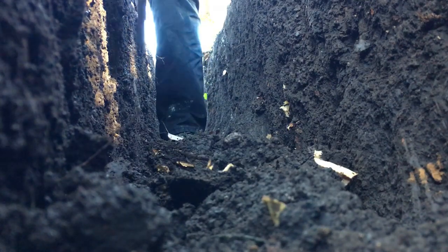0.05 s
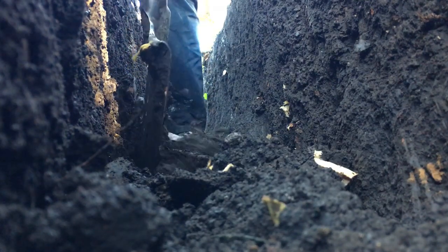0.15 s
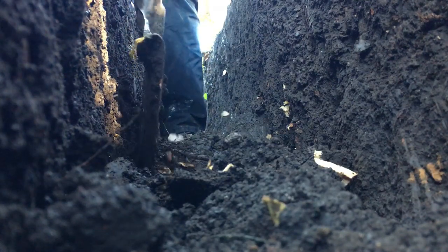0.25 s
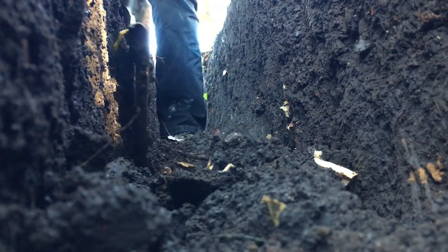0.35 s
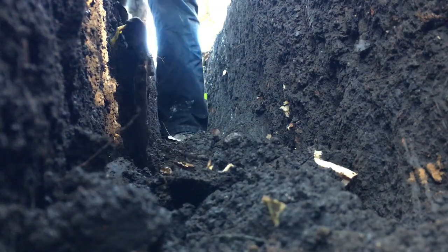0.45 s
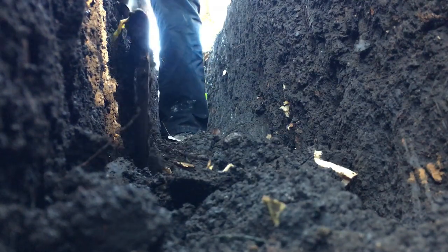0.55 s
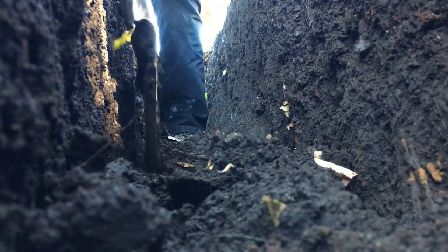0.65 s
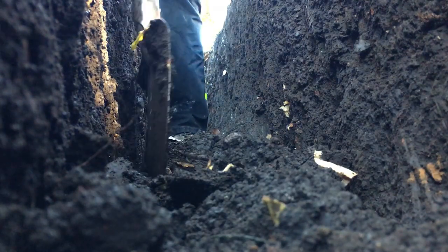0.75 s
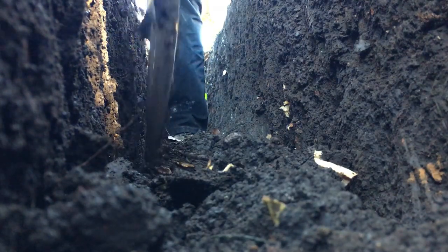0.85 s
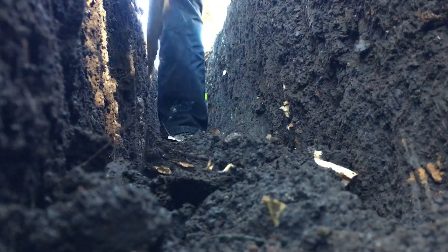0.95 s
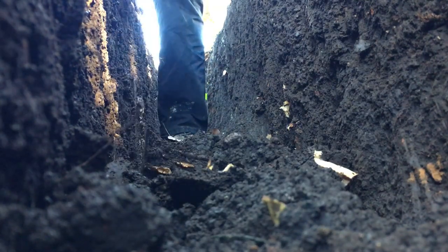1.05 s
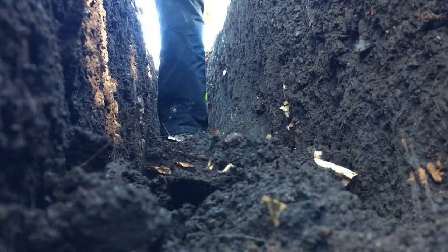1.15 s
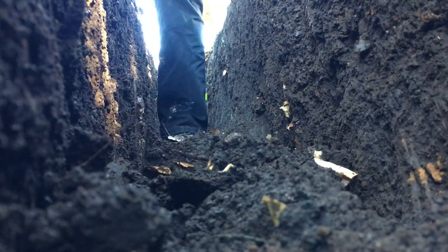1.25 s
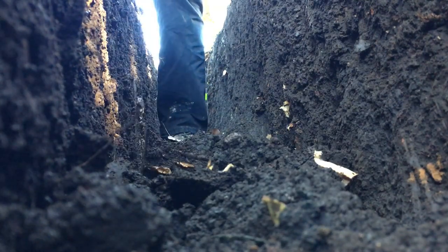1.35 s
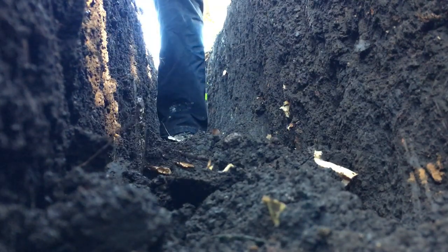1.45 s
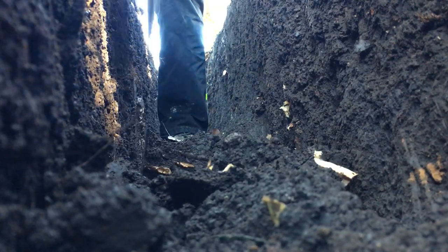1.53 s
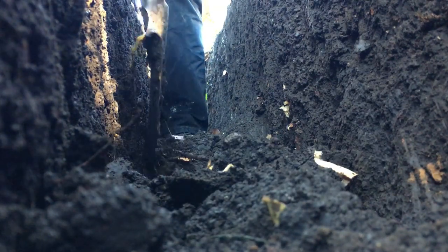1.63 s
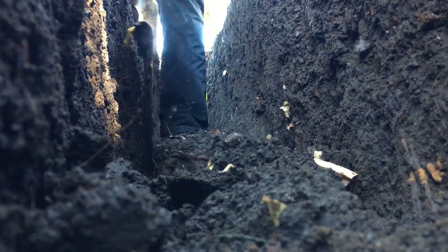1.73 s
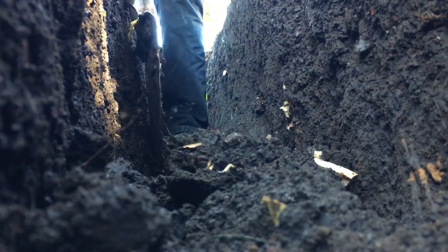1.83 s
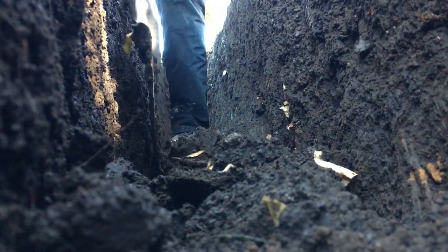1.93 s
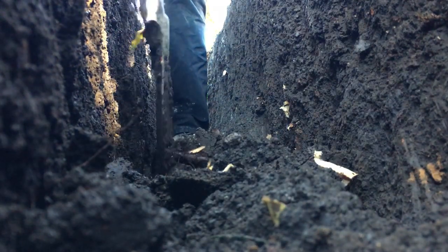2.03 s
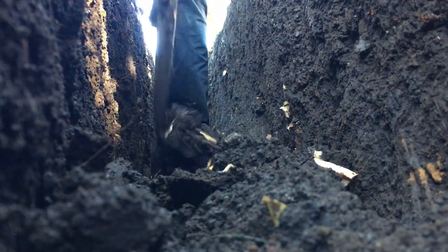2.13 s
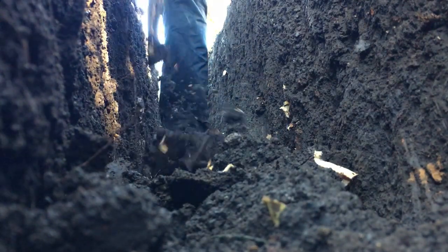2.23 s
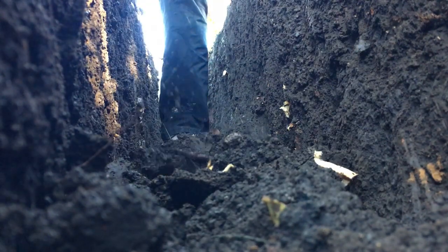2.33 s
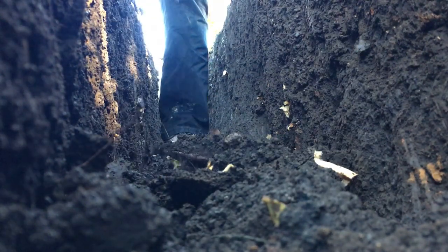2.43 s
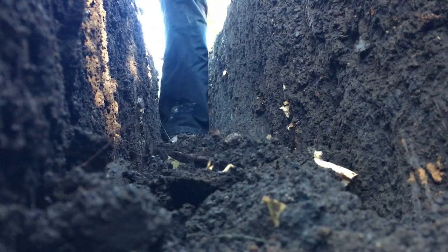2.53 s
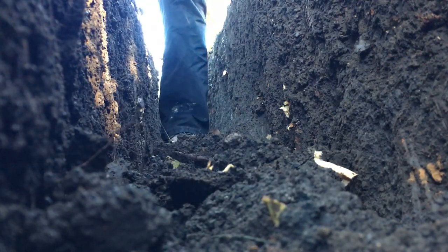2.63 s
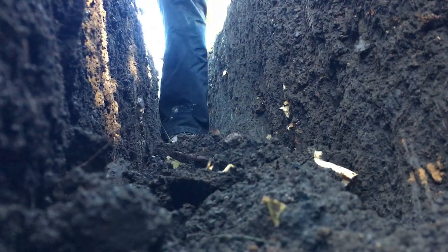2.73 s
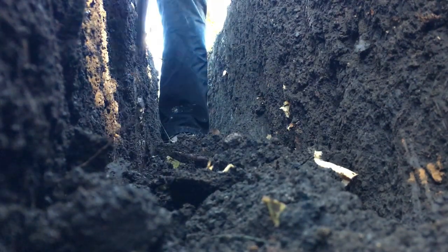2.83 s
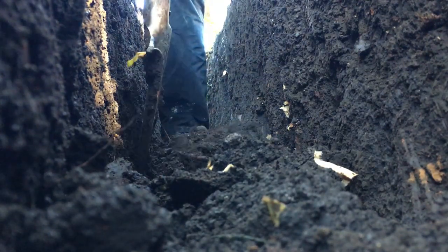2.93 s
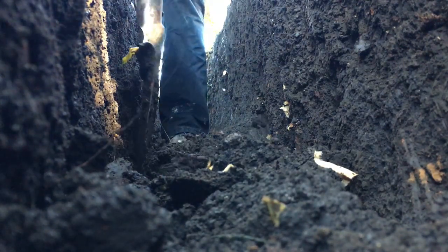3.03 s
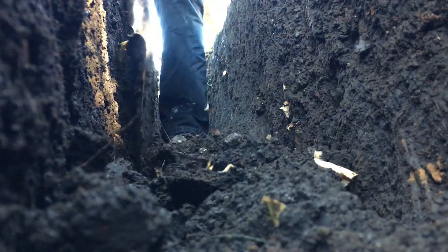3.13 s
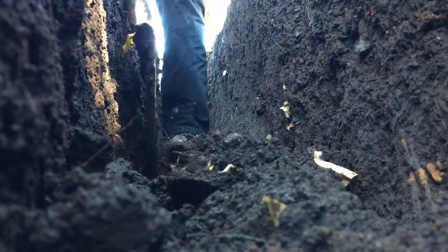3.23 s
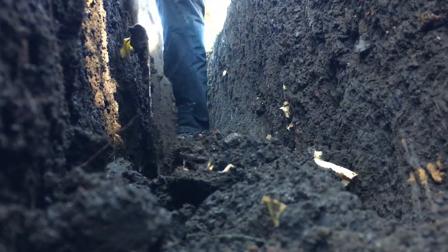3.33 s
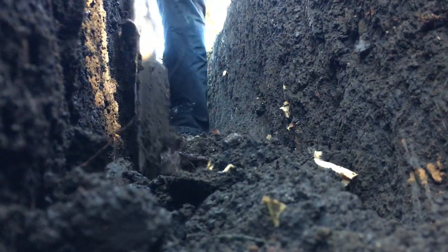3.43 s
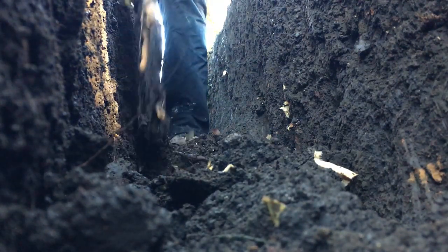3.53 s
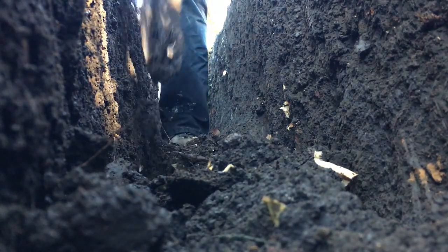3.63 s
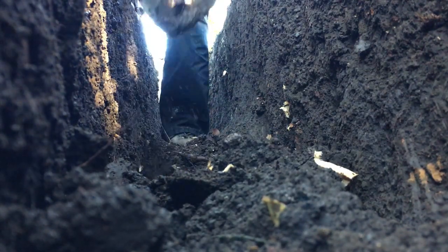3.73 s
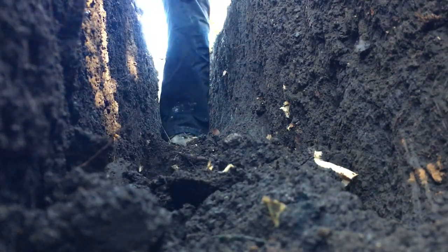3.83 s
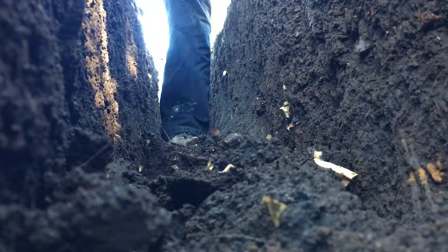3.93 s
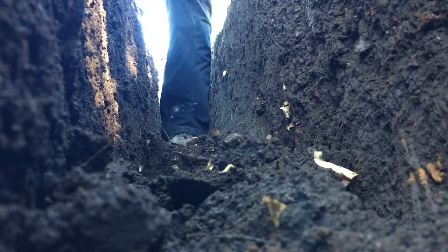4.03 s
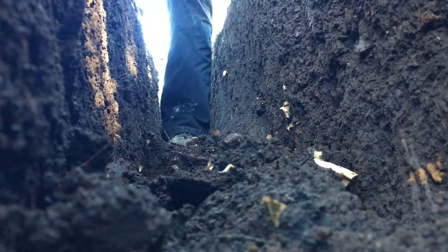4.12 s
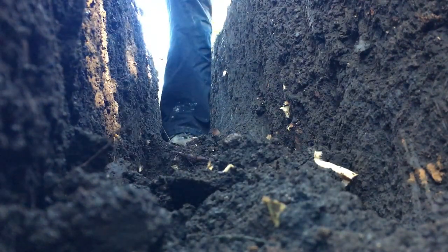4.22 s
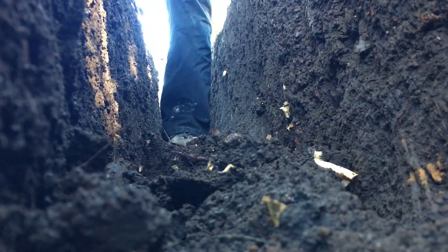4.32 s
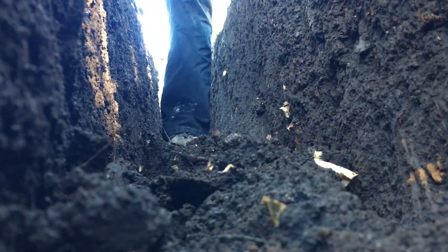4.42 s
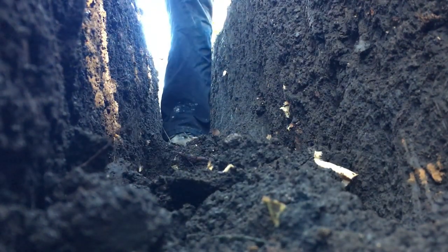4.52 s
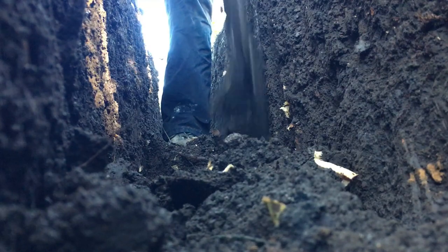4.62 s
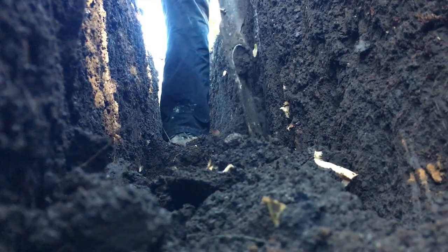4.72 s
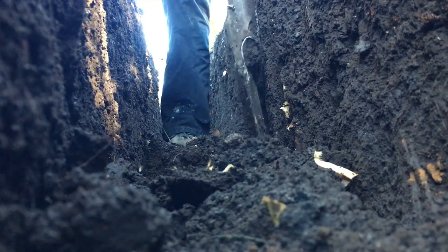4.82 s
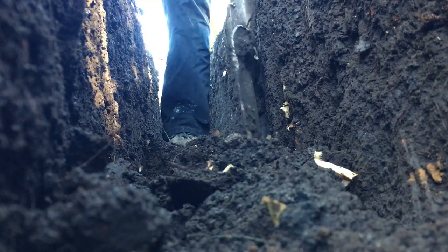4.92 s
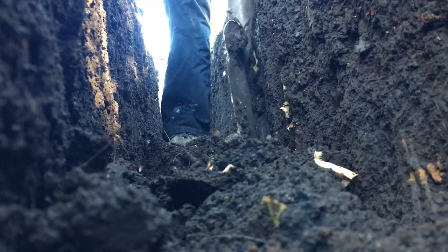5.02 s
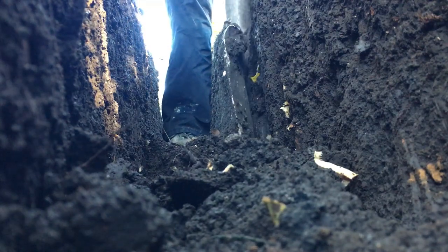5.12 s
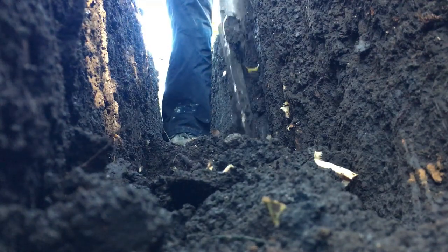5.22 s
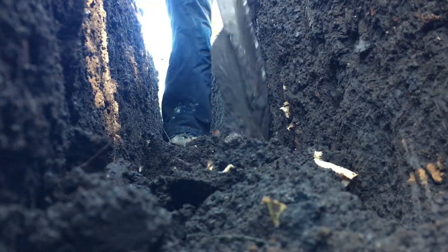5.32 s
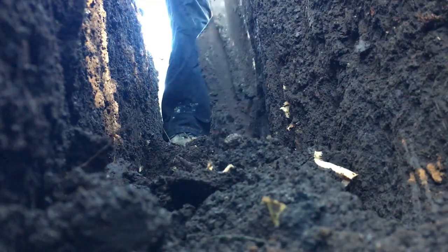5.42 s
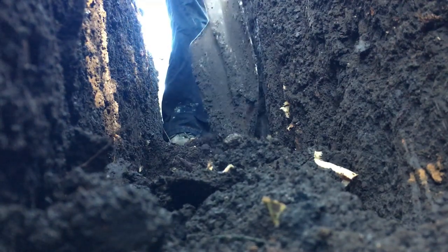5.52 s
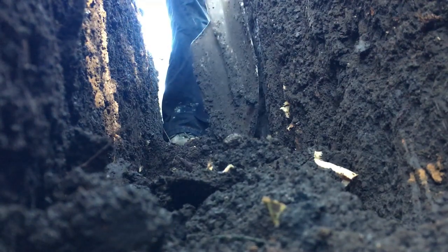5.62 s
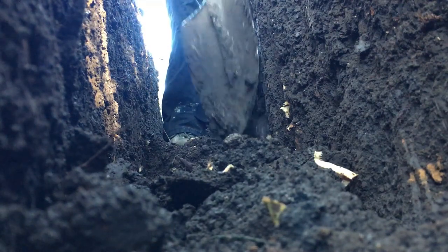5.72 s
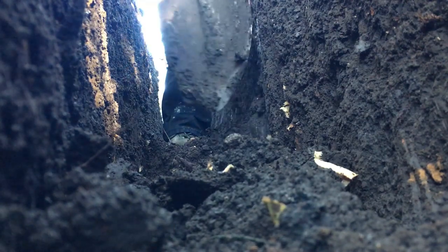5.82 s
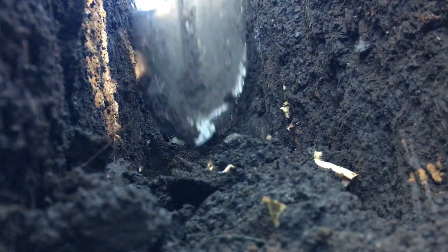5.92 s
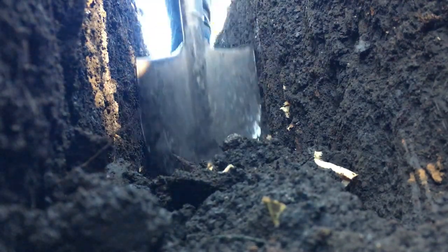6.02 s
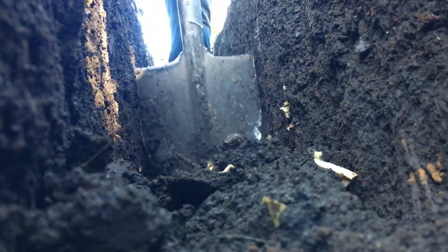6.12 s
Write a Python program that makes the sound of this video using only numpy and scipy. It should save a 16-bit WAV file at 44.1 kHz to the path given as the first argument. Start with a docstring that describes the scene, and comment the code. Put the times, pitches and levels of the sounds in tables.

```python
"""A spade is chopped four times into the damp wall of a narrow trench, heard from the trench floor.
Each chop is a set of noisy bites: random clicks make the blade ring and the grit crackle, while low
decaying sine waves give the thud of the ground. Crumbs and clods fall as short patters with dull knocks,
the blade scrapes out, and fine soil trickles as random clicks. Smooth noise is a distant outdoor rumble."""
import sys
import numpy as np
from scipy import signal
from scipy.io import wavfile

SR = 44100
rng = np.random.default_rng(int(sys.argv[2]) if len(sys.argv) > 2 else 0)


def to_wav(sig):
    """Store sig (one row per channel, or 1-D mono) as 16-bit WAV at the path in sys.argv[1].

    Samples outside -1..1 are clipped; the rate is SR.
    """
    pcm = np.clip(np.atleast_2d(sig), -1, 1) * 32767
    pcm = np.round(pcm).astype(np.int16)
    wavfile.write(sys.argv[1], SR, pcm.T)  # frames by channels


N = 271656  # length in samples

# The blade or a clod stops in the ground; both rings are relative to the main one:
# (t/s, blow level/dB, stiffness as a factor on pitch, deep ring level/dB, upper ring level/dB)
THUD_EVENTS = [(0.1631, -10.5, 2.37, -23, -1.5), (0.172, -4.5, 0.94, -5.5, 3), (.636, -29, 1.25, -20, 2),
               (0.66, -34, 1.44, -18, 4.5), (0.699, -37.5, 1.1, -7, -9), (0.739, -28.5, 1.18, -15, -13),
               (1.651, -14, 1.4, 5, -4.5), (1.662, -4.5, .8, -2, 1), (1.843, -31.5, 1.05, 2.5, 5),
               (2.939, -13, 1.03, -11, 0.5), (2.95, -22.5, 2.7, -10, -10), (2.971, -8.5, 0.9, -8, 3),
               (2.993, -29.5, 1.35, 2, -1), (3.023, -28, 2.56, -1.5, 11), (3.19, -23, 2.3, 1.5, 0.5),
               (3.588, -36, 1.27, 0, 3.5), (4.668, -26, 1.3, -6, 1), (4.686, -13, 1.24, -12, 1),
               (4.7259, -4.5, 1.01, -7, 1.5), (5.821, -40.5, 0.94, -1.5, 5.5), (5.879, -39.5, 0.81, 4, -1),
               (5.931, -54, 1.76, 2, 16), (6.004, -25, 0.69, 4.5, 1), (6.017, -31.5, 1.1, -13, 8),
               (6.049, -25.5, 1.38, 2.5, -3.5), (6.076, -27, 1.46, 0.5, 4.5), (6.106, -32, 0.91, -2, 9),
               (6.132, -38, 0.61, -4, 4)]
# Tone of soil rubbing the blade, also used for dull crumbs: (f/Hz, level per Hz/dB)
SCRAPE_TONE = [(180, -25), (300, 7.5), (472, -12.5), (734, 0), (978, -3.5), (1240, -1), (1670, -8),
               (2650, -22.5), (3500, -24.5), (4550, -52.5), (7700, -120)]
# Tone of grains heard between the trench walls: (f/Hz, level per Hz/dB)
TRICKLE_TONE = [(1060, -26), (1800, -4.5), (2250, -13), (2660, -4), (3050, -8), (4380, -6.5), (4940, -11.5),
                (5900, -5), (8010, -11), (9290, -5), (10300, -11.5), (12500, -6), (15200, -9.5),
                (16000, -20), (16500, -34.5)]


def gain_of(db):
    """Turns decibels into a factor on amplitude."""
    return 10 ** (np.asarray(db) / 20)


def evened(x):
    """Scales a signal to an effective (RMS) level of 1."""
    return x / np.sqrt(np.mean(x ** 2) + 1e-20)


def add(mix, start_s, sound):
    """Adds a sound into the mix at its start time, cut off at the end of the mix."""
    part = mix[round(start_s * SR):][:len(sound)]
    part += sound[:len(part)]


def coloured(x, points):
    """Causal filter with the given spectrum, floored at -80 dB; keeps the power of white noise."""
    f, db = np.transpose(points)
    hz = abs(np.fft.fftfreq(2 ** 13, 1 / SR))
    curve_db = np.interp(np.log(hz + 1), np.log(f + 1), db)
    log_gain = np.log(gain_of(np.maximum(curve_db, -80)))
    phase = -signal.hilbert(log_gain).imag  # minimum phase: the response starts at once
    taps = np.fft.ifft(np.exp(log_gain + 1j * phase)).real[:4096]
    return signal.oaconvolve(x, taps / np.linalg.norm(taps))[:N]


def grains(per_s, spread_db):
    """Random clicks of uneven size, a few of them large."""
    size = gain_of(spread_db * np.minimum(rng.exponential(1, N), 4)) * rng.standard_normal(N)
    return evened(size * (rng.random(N) < per_s / SR))


def lumps(ms, depth_db):
    """Random gain that changes every few milliseconds, as clumps catch and let go."""
    steps = rng.standard_normal(N // 64 + 1)  # one step per 64 samples
    step_ms = np.arange(-60, 61) * 64000 / SR
    smooth = signal.oaconvolve(steps, np.exp(-(step_ms / ms) ** 2), "same")
    return evened(gain_of(depth_db * np.repeat(evened(smooth), 64)[:N]))


def burst(rise_ms, hold_ms, t60):
    """Loudness curve: soft rise, hold, then an exponential fall by 60 dB in t60 seconds."""
    ms = np.arange(0, 480, 1000 / SR)
    rise = np.minimum(ms / max(rise_ms, .1), 1) ** 2
    fall_ms = np.maximum(ms - rise_ms - hold_ms, 0)
    return rise * gain_of(-60 * fall_ms / (1000 * t60))


def ring(modes, factor):
    """Response of damped modes to a click, neighbours in opposite phase; keeps the power of white noise."""
    t = np.arange(1024) / SR
    taps = np.zeros(len(t))
    for k, (f, width, db) in enumerate(modes):
        decay = np.sqrt(width) * np.exp(-np.pi * width * t)  # a wider mode dies away sooner
        taps += (-1) ** k * gain_of(db) * decay * np.sin(2 * np.pi * f * factor * t)
    return taps / np.linalg.norm(taps)


def crackle(coarse, fine, per_s, spread_db):
    """Each grain size clicks in its own band at its own moments; the level blends from coarse to fine."""
    # Edges between the bands of the grain sizes, large grains first: f/Hz
    grain_edges = [1000, 2600, 4000, 5600, 7500, 10000, 13000, 18000]
    out = np.zeros(N)
    for k, band in enumerate(zip(grain_edges, grain_edges[1:])):
        share = k / (len(grain_edges) - 2)
        clicks = coarse ** (1 - share) * fine ** share * grains(per_s, spread_db)
        out += signal.sosfilt(signal.butter(2, band, "bandpass", fs=SR, output="sos"), clicks)
    return out


def flow_db(t, order=1):
    """Reads a column of the sliding soil at times t, on straight lines between the rows."""
    # Loose soil sliding and trickling: (t/s, flow level/dB, low tumble level/dB)
    sliding = [(0, -82.5, -82), (.15, -64, -39.5), (0.201, -55, -27), (0.331, -64, -55), (.7, -59.5, -49),
               (.8, -70, -56), (1.279, -78.5, -64), (1.549, -75, -58.5), (1.699, -56.5, -61.5),
               (1.81, -68.5, -43), (2.018, -62.5, -55), (2.16, -70.5, -57.5), (2.439, -65, -47),
               (2.66, -79.5, -67.5), (2.919, -71.5, -64.5), (3.05, -56.5, -50), (3.32, -65, -56.5),
               (4.06, -68.5, -54.5), (4.2, -83.5, -57.5), (4.6, -73.5, -50.5), (5.09, -71.5, -58),
               (5.39, -73, -51), (5.63, -71.5, -63.5), (5.79, -74, -59.5), (5.9, -72.5, -50.5),
               (6.1, -70, -40)]
    s, *columns = np.transpose(sliding)
    return np.interp(t, s, columns[order - 1])


def air():
    """Smooth distant rumble and hiss: noise shaped by one fixed spectrum."""
    # Outdoor background: (f/Hz, level per Hz/dB)
    air_tone = [(12, -32), (20, -4), (58, 2), (102, -2.5), (372, -20.5), (479, -27), (1080, -27.5),
                (1840, -38), (4050, -41.5), (4930, -47.5), (12800, -40.5), (15200, -47.5), (16500, -50.5)]
    return gain_of(-52) * coloured(rng.standard_normal(N), air_tone)


def slide():
    """Grains of three kinds: earth rubbing the blade, fine trickle, and lumps tumbling."""
    # Lumps rolling down: (f/Hz, level per Hz/dB)
    tumble_tone = [(12, -37.5), (20, -14), (59, 0.5), (130, -2), (177, -8), (200, -5.5), (238, -8.5),
                   (343, -22.5), (500, -18), (650, -55.5), (1100, -120)]
    crumble_db, crumble_t60 = -48, 0.21  # earth crumbling along the blade, relative to the blow; s
    shake_db, shake_t60 = -30.5, 0.1  # lumps shaken loose, relative to the blow; s
    usual_flow_db, fine_follows = -69, .65  # the fine trickle swings less than the flow

    t = np.arange(N) / SR
    flow, tumble = flow_db(t), gain_of(flow_db(t, order=2))
    scrape = gain_of(flow + 3)
    for s, blow_db, *_ in THUD_EVENTS:
        add(scrape, s, gain_of(blow_db + crumble_db) * burst(8, 25, crumble_t60))
        add(tumble, s, gain_of(blow_db + shake_db) * burst(6.1, 21, shake_t60))
    fine = gain_of(usual_flow_db + 1 + fine_follows * (flow - usual_flow_db))

    clumps, gusts = lumps(12, 3), lumps(10, 2.2)
    rub = coloured(scrape * clumps * grains(2500, 3.2), SCRAPE_TONE)
    trickle = coloured(crackle(gain_of(flow) * gusts, fine * gusts, 3500, 1.3), TRICKLE_TONE)
    return rub + trickle + tumble * coloured(grains(330, 2.8), tumble_tone)


def chops():
    """Breaking grit knocks the blade and crackles; thrown soil hisses on after it."""
    # The blade bites or drags through grit; the last column raises or lowers the pitch of its ring:
    # (t/s, knock level/dB, coarse grit level/dB, fine grit level/dB, length/ms, factor on blade pitch)
    bites = [(0.1565, -33.5, -40, -31.5, 11, 1.85), (0.1629, -23.5, -4.5, -18, 4.1, 3.07),
             (0.165, -11.5, -23, -10, 8.4, 0.97), (0.177, -20.5, -33.5, -34.5, 9.4, 0.88),
             (0.4222, -37.5, -44, -54.5, 21.7, 0.685), (0.596, -47, -59, -72, 80, .97),
             (.605, -52, -62, -63, 146, 2.025), (0.669, -53.5, -61, -60, 97.5, 0.98),
             (1.642, -23.5, -31, -24.5, 13.4, 1.25), (1.649, -11.5, -16.5, -11, 9.7, 1.255),
             (2.932, -28, -41, -32.5, 8.9, 0.49), (2.9433, -12.5, -23.5, -20.5, 6.3, 1.23),
             (2.954, -15, -23.5, -19.5, 3, 0.9), (2.961, -12, -27.5, -14.5, 9.3, 0.91),
             (4.36, -63.5, -96, -85, 440, 0.61), (4.663, -31.5, -38, -41.5, 17, 0.78),
             (4.687, -35.5, -44.5, -59, 15, 1.2), (4.678, -22.5, -43, -26, 8.3, 1.045),
             (4.715, -19.5, -36, -30, 6.5, 0.77), (4.721, -12, -21.5, -12.5, 3.7, 0.817),
             (4.728, -25.5, -36, -41, 5.9, 1.2), (4.96, -60.5, -74, -59.5, 178, 1.016),
             (5.996, -49.5, -64.5, -45.5, 26.3, 0.98), (6.052, -60, -71, -62.5, 95, 0.75)]
    # Ringing of the mud-damped blade, its pitch still to be multiplied: (f/Hz, width/Hz, level/dB)
    blade_modes = [(710, 230, -3), (1095, 130, -1.5), (1303, 150, -1.5), (1575, 130, -6.5),
                   (2640, 860, -12.5), (2920, 200, -18.5)]
    rise_share, longest_rise_ms = .4, 9.1  # the bite swells over this share of its length
    spray_db = -25  # thrown soil, relative to the mean of knock and fine grit

    blade, coarse, fine, spray = np.zeros((4, N))
    catches = grains(8000, 1.7) * lumps(9, 1.0)
    patter = rng.standard_normal(N)
    for s, knock_db, coarse_db, fine_db, ms, pitch_factor in bites:
        rise_ms = min(rise_share * ms, longest_rise_ms)
        hold_ms = ms - rise_ms
        thrown = gain_of((knock_db + fine_db) / 2 + spray_db) * burst(rise_ms, hold_ms, .14)
        here = slice(round(s * SR), round(s * SR) + len(thrown))
        size = len(catches[here])  # shorter at the end of the scene
        knocks = gain_of(knock_db) * burst(rise_ms, hold_ms, 0.026)[:size] * catches[here]
        knocks = knocks + gain_of(-1.5) * thrown[:size] * patter[here]
        add(blade, s, signal.oaconvolve(knocks, ring(blade_modes, pitch_factor)))
        add(coarse, s, gain_of(coarse_db) * burst(rise_ms, hold_ms, 0.006))
        add(fine, s, gain_of(fine_db) * burst(rise_ms, hold_ms, 0.01))
        add(spray, s, thrown)
    grit = crackle(coarse + spray, fine + gain_of(-3.0) * spray, 3000, 1.8)
    # Grit crushed in wet soil is duller than loose grains
    damp = signal.lfilter(*signal.butter(1, 11000, fs=SR), grit)
    return blade + gain_of(2.0) * coloured(damp, TRICKLE_TONE)


def thuds():
    """Soft ground rings at a few low modes that build up while the push lasts."""
    # Ringing of the ground before stiffness acts; t60 is the time to fall by 60 dB, times length below.
    # Rows are main, deep, then upper modes: (f/Hz, level/dB, t60/s)
    ground_modes = [(116.6, 4.5, .13), (74.4, -3, 0.29), (167.3, -0.5, .06), (251, -10, 0.11)]
    out, t = np.zeros(N), np.arange(SR // 3) / SR
    for s, blow_db, stiff, deep_db, upper_db in THUD_EVENTS:
        # Stiffer ground rings and gives way for a shorter time
        length, push_ms = .75 / stiff ** 0.76, 2.7 / stiff ** 0.82
        rings = []
        for hz, db, t60 in ground_modes:
            decay = gain_of(db - 60 * t / (t60 * length))
            rings.append(decay * np.sin(2 * np.pi * hz * stiff * t))
        main, deep, *upper = rings
        modes = main + gain_of(deep_db) * deep + gain_of(upper_db) * sum(upper)
        build_up = 1 - np.exp(-1000 * t / push_ms)
        add(out, s, gain_of(blow_db) * modes * build_up)
    return out


def small_crumbs():
    """Lesser crumbs at random moments, louder where more soil is moving."""
    per_s, above_flow_db, spread_db = 15, 5.5, 5.5  # levels start above the flow of the moment
    when, size, grit, sheen, pitch = rng.random((80, 5)).T
    s = np.cumsum(-np.log(1 - when)) / per_s  # random gaps
    db = flow_db(s) + above_flow_db + spread_db * size
    rows = np.transpose([s, db + 6.5, db - 14 * grit, db - 14 * sheen, 700 + 800 * pitch])
    return rows[s < N / SR]


def crumbs():
    """Each crumb bursts into a short patter with a dull knock, each with its own knock pitch."""
    # Crumbs landing: (t/s, knock level/dB, coarse grit level/dB, fine grit level/dB, knock f/Hz)
    landings = [(0.237, -39, -64, -49, 651), (0.261, -48, -48, -57, 633), (0.293, -29, -41, -79, 686),
                (0.41, -34, -55, -44, 744), (0.461, -33, -43.5, -78, 880), (0.541, -37, -46.5, -61, 980),
                (0.623, -26.5, -41, -68, 750), (0.64, -25.5, -52, -60, 1260),
                (0.718, -27.5, -43, -70, 1250), (0.738, -36, -60, -57, 1230),
                (0.783, -35.5, -57, -70.5, 1225), (0.888, -38, -60, -70.5, 1270),
                (0.989, -47, -55, -58.5, 678), (1.146, -64.5, -65, -55, 1130),
                (1.599, -50, -57.5, -40.5, 1140), (1.775, -56, -72, -53, 1070),
                (1.821, -41.5, -49.5, -45, 1054), (1.843, -35, -35, -51, 1070),
                (1.863, -33, -46, -46, 1030), (1.944, -36.5, -58.5, -60, 1270),
                (1.963, -35, -52, -54, 1440), (1.978, -40, -51, -52, 1410), (2.009, -39, -45.5, -49, 1500),
                (2.042, -41.5, -58, -62, 963), (2.101, -38.5, -67.5, -64.5, 1250),
                (2.168, -52.5, -65, -70, 1330), (2.32, -53, -51, -45.5, 778),
                (2.46, -59, -65.5, -50.5, 624), (2.495, -44, -50, -60.5, 926), (2.567, -38, -61, -62, 975),
                (2.595, -43.5, -58, -59, 966), (3.02, -28, -49, -47, 735), (3.092, -37, -52, -49, 790),
                (3.153, -31, -44, -41.5, 780), (3.189, -22, -44.5, -47, 905), (3.228, -34.5, -42, -41, 800),
                (3.315, -42, -44.5, -61.5, 1480), (3.328, -43.5, -49, -53, 1370),
                (3.373, -41.5, -47, -54, 1440), (3.422, -44, -47.5, -56, 1420),
                (3.5, -63, -54.5, -64, 1106), (3.581, -33.5, -44, -38.5, 1178),
                (3.766, -41.5, -62, -63.5, 1240), (3.99, -51, -55, -62, 1180),
                (4.053, -48.5, -70.5, -48, 1520), (4.164, -48.5, -65, -71.5, 994),
                (4.348, -59.5, -75.5, -56, 837), (4.755, -30, -48, -36, 616),
                (4.939, -41.5, -48, -61, 1200), (4.967, -38, -49, -39, 1330), (5.078, -38.5, -48, -67, 950),
                (5.109, -41.5, -47, -50, 1140), (5.161, -40, -45, -49, 1093),
                (5.311, -48, -64.5, -62.5, 659), (5.66, -45.5, -65, -60.5, 1550),
                (5.814, -47, -67, -56, 740), (6.005, -42, -55, -45, 802), (6.037, -33.5, -33, -55, 778),
                (6.048, -34, -53, -49, 783), (6.082, -58, -56, -57, 770)]
    hold_ms = 2.25
    knock, pitched, coarse, fine = np.zeros((4, N))
    bits = grains(5000, 2.2)
    for s, knock_db, coarse_db, fine_db, hz in [*landings, *small_crumbs()]:
        tap = gain_of(knock_db) * burst(0.74, hold_ms, 0.036)
        add(knock, s, tap)
        hits = bits[round(s * SR):][:len(tap)]
        add(pitched, s, signal.oaconvolve(tap[:len(hits)] * hits, ring([(hz, hz / 5, 0)], 1)))
        add(coarse, s, gain_of(coarse_db) * burst(1.0, hold_ms, 0.045))
        add(fine, s, gain_of(fine_db) * burst(.6, hold_ms, 0.0081))
    dull = gain_of(-14.5) * coloured(knock * bits, SCRAPE_TONE) + gain_of(-13.5) * pitched
    return dull + coloured(crackle(coarse, fine, 3000, 2.3), TRICKLE_TONE)


def scene():
    """Adds all the sources into one channel."""
    return (chops() + thuds() + crumbs() + slide() + air())[None]


def record(dry):
    """The microphone drops the deepest bass; the loudest peaks round off softly; then the band limit."""
    thin = signal.sosfilt(signal.butter(3, 57, "highpass", fs=SR, output="sos"), dry)
    soft = .93 * np.tanh(thin / .93)
    band_limit = signal.firwin(511, 16300, window=("kaiser", 12), fs=SR)  # low-pass edge in Hz
    return signal.oaconvolve(soft, band_limit[None], "same")


dry = scene()
out = record(dry)
to_wav(out)
```